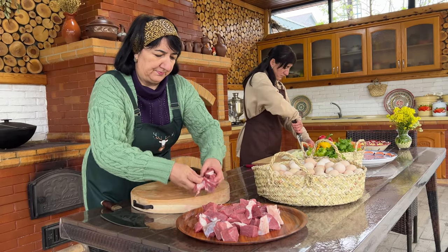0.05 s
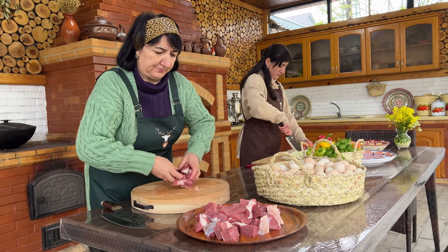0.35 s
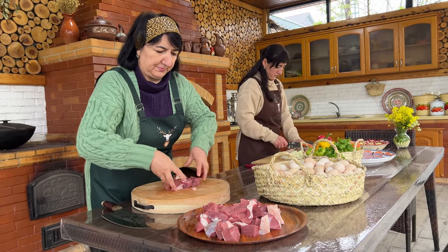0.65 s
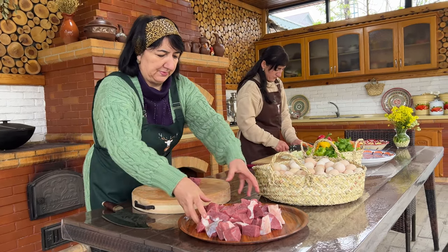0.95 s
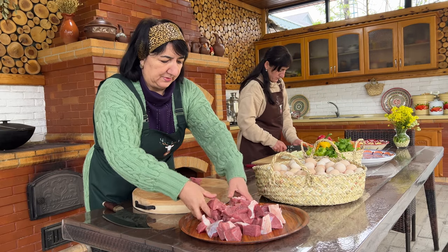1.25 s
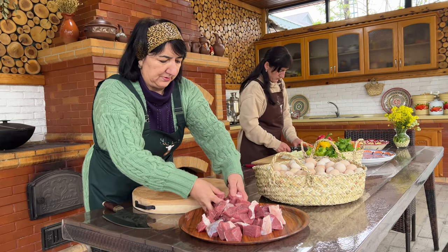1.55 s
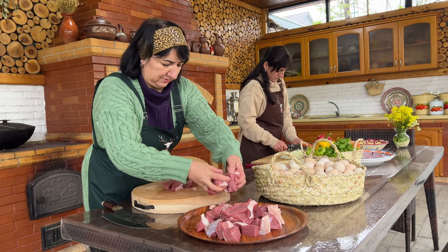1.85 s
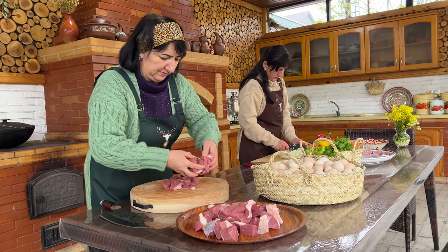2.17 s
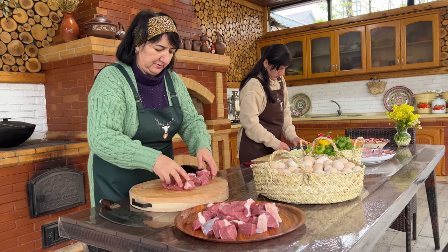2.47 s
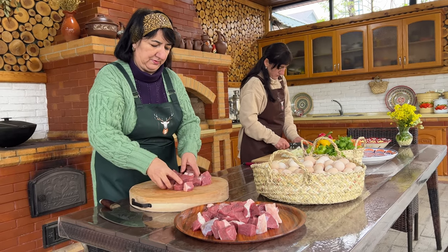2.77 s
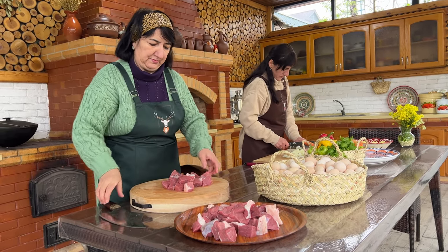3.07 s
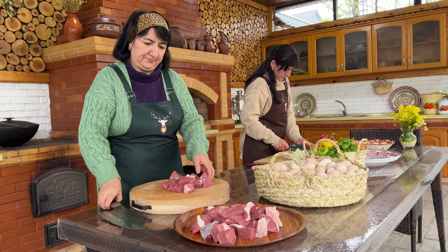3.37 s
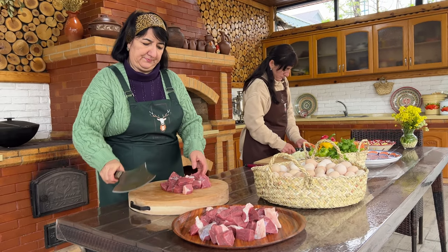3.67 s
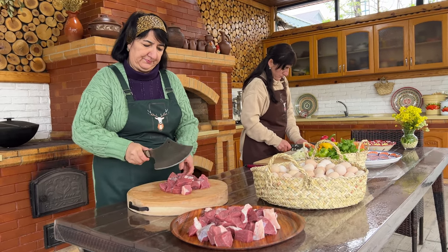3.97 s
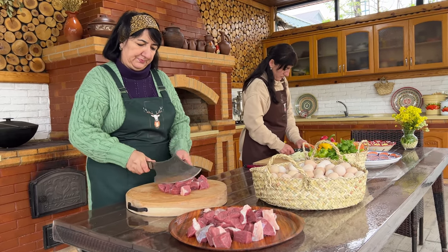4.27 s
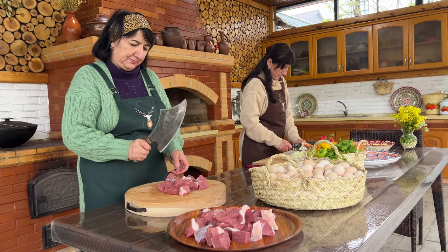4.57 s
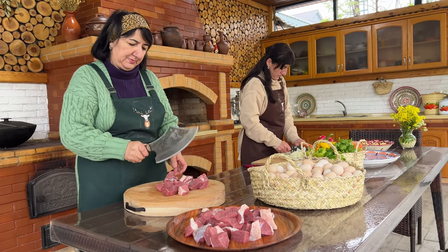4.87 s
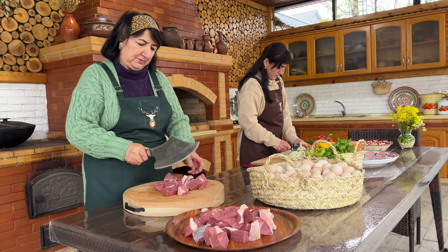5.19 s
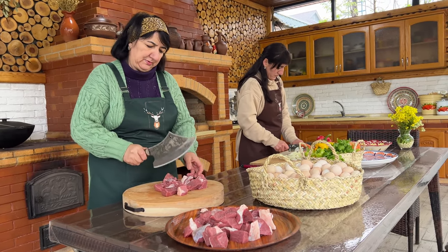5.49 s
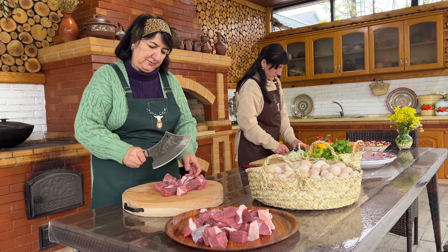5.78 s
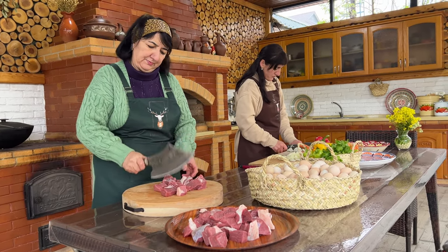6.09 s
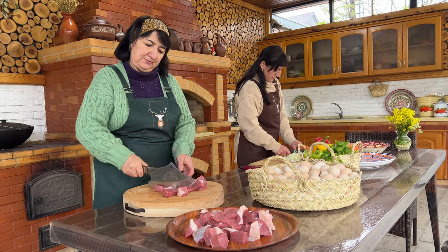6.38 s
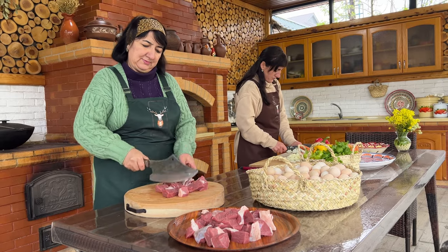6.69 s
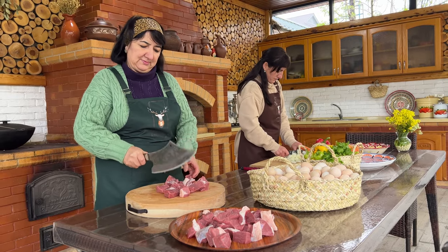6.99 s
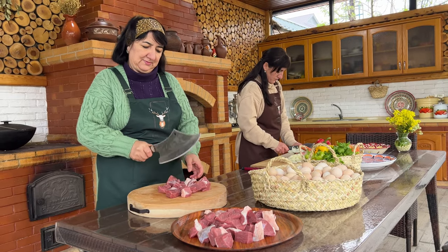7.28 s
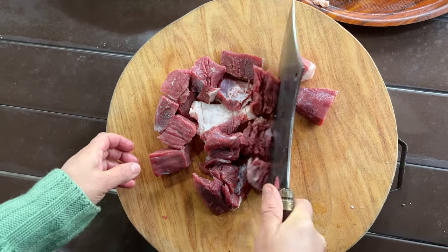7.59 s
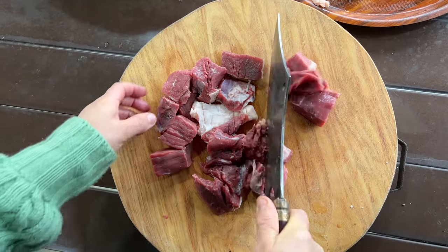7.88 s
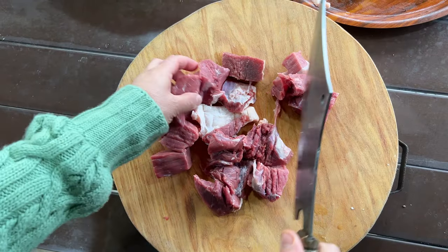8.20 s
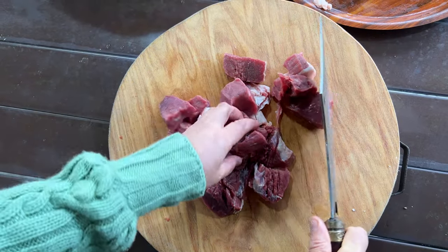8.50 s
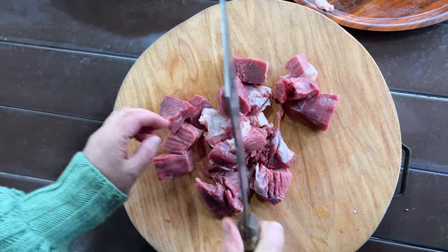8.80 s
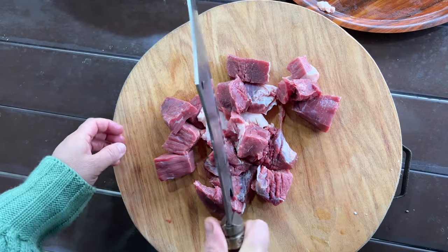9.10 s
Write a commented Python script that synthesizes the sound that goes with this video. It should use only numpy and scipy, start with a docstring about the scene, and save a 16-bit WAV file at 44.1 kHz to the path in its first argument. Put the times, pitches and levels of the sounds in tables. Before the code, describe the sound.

Slow knife knocks and moist rustling give way to quick cleaver chops through raw meat onto wood, over faint outdoor air.

```python
"""Wet meat rustles in the hands over steady outdoor air: two cooks cut raw meat in a roofed kitchen.
One slices slowly, her knife hissing through the fibres and knocking on the board. From 4.7 s the other
chops with a cleaver: a squelch, a crack on thick wood, the board hopping on the table. The last chops
are heard from just above the board, where they shake the table and the heaviest overload the microphone."""
import sys
import numpy as np
from scipy import signal
from scipy.fft import rfft, irfft
from scipy.io import wavfile
from scipy.ndimage import uniform_filter1d

SR = 44100
rng = np.random.default_rng(int(sys.argv[2]) if len(sys.argv) > 2 else 0)


def dump(signal):
    """Clip the signal to [-1, 1] and save it as 16-bit WAV at the path in sys.argv[1]."""
    limited = np.clip(np.atleast_2d(signal).T, -1, 1)
    pcm = np.round(limited * 32767).astype(np.int16)
    wavfile.write(sys.argv[1], SR, pcm)


N = 407925
TIME_S = np.arange(N) / SR
HIT_TIME_S = TIME_S[:2 ** 14]

# air and draught spectra: freq_hz, gain_db
AIR_FAR = [(41, -17), (70, -9), (155, -10.5), (213, -22.5), (244, -6.5), (280, -18), (394, -12.5),
           (431, -21), (462, -16.5), (727, -21.5), (834, -18.5), (1230, -24.5), (2780, -32.5), (16000, -58)]
AIR_NEAR = [(41, -43), (70, 3), (86, -31), (152, 4.5), (178, -16), (244, -4), (274, -24), (307, -6.5),
            (336, -28), (412, -21.5), (517, -26), (761, -24), (1020, -27.5), (4190, -35), (16000, -68)]
RUMBLE = [(8, -5), (18, 13.5), (32, -7), (50, -9.5), (80, -19.5), (160, -37), (400, -82)]
# draught on the microphone: time_s, level_db
DRAUGHT = [(0, -40.5), (.5, -36), (2.4, -39.5), (3.3, -32), (5.5, -42), (6.6, -37.5), (8, -29.5),
           (8.4, -39), (9.25, -33)]
# air crossfade: time_s, near (0 across the table, 1 above the board)
NEARNESS = [(7.1, 0.01), (7.45, 0.98)]
# kitchen decay: freq_hz, t60_s
ROOM_T60 = [(500, 0.37), (3000, 0.34), (12000, 0.3)]
# room tail spectra by blow: freq_hz, gain_db
CHOP_ROOM = [(40, 5), (120, 11), (400, 0), (800, 0.5), (1500, -9.5), (2800, -10), (4500, -19.5),
             (6500, -31.5), (10000, -39), (16000, -47)]
HOP_ROOM = [(60, 8.5), (150, 0.5), (400, 5.5), (700, -7), (1300, -11.5), (2800, -20), (5000, -32),
            (8000, -44), (16000, -53)]
KNOCK_ROOM = [(60, -15.5), (150, -0.5), (260, 0.5), (400, 2), (620, -1.5), (900, -8), (1300, -15.5),
              (2000, -21.5), (4000, -27.5), (16000, -58)]
CLICK_ROOM = [(60, -40), (300, -3), (1000, 14.5), (2000, -0.5), (3500, -2.5), (5500, -11), (8000, -18),
              (16000, -34)]
# contact noise spectra: freq_hz, gain_db
RUB = [(100, -2), (330, 8.5), (700, -1), (1300, -6.5), (2500, -15.5), (6000, -30), (16000, -42)]
SLICE = [(100, 2), (300, 5.5), (600, 1), (1200, -12), (2000, -10.5), (2800, -13), (5500, -16.5),
         (7000, -25.5), (11000, -27), (16000, -32)]
EDGE_CLICK = [(50, -38), (200, -2.5), (500, 10), (900, 9), (1700, -2.5), (3000, -5), (4500, -12.5),
              (7000, -23), (11000, -33), (16000, -43)]
SQUELCH = [(300, 0.5), (1500, -4), (4000, -2), (6500, -10.5), (9000, -13), (16000, -21)]
CRACK = [(150, -14), (600, 4), (1500, 4.5), (2500, -2.5), (4000, -12.5), (6300, -26), (8500, -26.5),
         (16000, -36)]
CLACK = [(200, -20), (900, 13.5), (1700, 5), (3000, 0), (4500, -10), (7000, -27), (11000, -34),
         (16000, -54)]
# modes: freq_hz, gain_db, t60_s
PLATE_MODES = [(588, 5.5, 0.24), (1000, -5, 0.3), (1125, 2.5, 0.082), (1540, -9, 0.087), (2770, -19, 0.045)]
BLADE_MODES = [(2580, 1, 0.19), (2700, -7, 0.3), (5700, -14, .2)]
SLICING_BOARD_MODES = [(152.5, -9, 0.078), (330, -1, 0.042), (569, -2, 0.1), (698, 0, 0.039),
                       (1150, -8, 0.01)]
CHOPPING_BOARD_MODES = [(119, 0, 0.044), (230, -3.5, 0.064), (476, -1.5, 0.045), (532, 3, 0.018),
                        (791, -2, 0.032), (1056, -4.5, 0.012), (1251, -11, 0.047), (1487, -13.5, 0.08),
                        (1903, -19, 0.049)]
TABLE_MODES = [(139.7, -6.5, 0.197), (279.6, -5, 0.15), (366.7, 2.5, 0.076), (509.6, -3, 0.095),
               (720, 0, 0.028), (1100, -15, 0.059), (1470, -7, 0.017)]
# thin squeaks: start_s, length_s, start_hz, end_hz, level_db
SQUEAKS = [(0.11, 0.0051, 2950, 1450, -41.5), (8.207, 0.042, 4400, 4170, -58.5)]
# meat slides or flops on wood: start_s, end_s, level_db
RUBS = [(0.164, 0.35, -51), (1.245, 1.297, -47), (7.99, 8.023, -42.5), (8.024, 8.059, -45)]
# meat turned in the hands: start_s, end_s, relative_db
RUSTLES = [(0, 0.504, -62.5), (0.922, 1.194, -66), (1.208, 1.45, -60.5), (1.816, 2.48, -61.5),
           (3.203, 3.478, -68), (8.05, 8.587, -63)]
# meat unsticking from fingers and blade: start_s, relative_db
SMACKS = [(1.296, -45), (1.5738, -47), (3.244, -48.5), (3.881, -58), (4.9207, -39.5), (7.4318, -38),
          (8.158, -45), (8.2244, -51), (8.3054, -51), (8.3524, -48), (8.517, -47.5)]
# fingers nudging the clay plate: start_s, relative_db
NUDGES = [(1.15, -29.5), (1.224, -37.5), (1.261, -40.5)]
# slicing strokes: impact_s, knock_db, hiss_db
STROKES = [(1.375, -26, -50.5), (1.982, -18.5, -47.5), (2.418, -11.5, -59), (3.533, -23, -49),
           (4.264, -24.5, -44.5), (4.957, -23.5, -44.5), (5.606, -20, -44), (6.317, -20.5, -43),
           (7.003, -27, -44)]
# cleaver chops: impact_s, force_db, wet_db, flight_s, landing_db, near
CHOPS = [(4.702, -8, -40.5, .041, -25.5, 0.01), (5.0691, -4.5, -47.5, .042, -25, 0.08),
         (5.3691, -3.5, -42.5, 0.047, -26.5, 0.28), (5.639, -4.5, -52, 0.043, -26.5, 0.02),
         (5.8937, -3, -45, .052, -30.5, 0.12), (6.1529, 1, -45, 0.055, -25.5, 0),
         (6.4055, .5, -35, 0.05, -31, 0.13), (6.656, -3.5, -43, 0.052, -28, 0.1),
         (6.905, -0.5, -50, 0.055, -26, 0.11), (7.006, -11, -49, 0.036, -29, 0.51),
         (7.148, -6, -53, .041, -31, 0.3), (7.3063, -2, -34, 0.037, -14.5, 0.92),
         (7.5927, 0.5, -34, 0.031, -14, 0.98), (7.8633, 7.5, -31.5, 0.04, -15.5, 0.98),
         (8.896, -16, -29.5, .03, -25.5, 0.89), (9.23, -2, -26, .035, -12, 0.99)]

# pairs: across the table, above the board
CRACK_DB, BOARD_DB, TABLE_DB = (-24.5, -19.5), (-21, -9.5), (-30.5, -19.5)  # at force 0 dB
SHAKE_DB, CHOP_ROOM_DB = (-34, -8), (-28.5, -31.5)  # at force 0 dB
CLACK_DB, HOP_ROOM_DB = (-3, -12), (-9, -18.5)  # re landing
ROOF_GAIN_DB, ROOF_LAG_S = (2, 0), (0.016, 0.012)


def amp(db):
    """Decibels to gain."""
    return 10 ** (np.asarray(db) / 20)


def curve(rows, at):
    """Straight lines through (x, value) rows."""
    return np.interp(at, *np.transpose(rows))


def between(pair, near):
    """Blend from across the table (near 0) to above the board (near 1)."""
    return pair[0] + (pair[1] - pair[0]) * near


def unit(x):
    """Scale to rms 1."""
    return x / np.sqrt(np.mean(x ** 2))


def unit_hit(x):
    """Scale the loudest 10 ms to rms 1."""
    return x / np.sqrt(uniform_filter1d(x ** 2, size=441).max())


def tint(x, spectrum, size=2048):
    """Minimum-phase filter through (freq_hz, gain_db) points."""
    hz, db = np.transpose(spectrum)
    log_hz = np.log(np.fft.rfftfreq(size, 1 / SR) + 1)
    cepstrum = irfft(np.log(amp(np.interp(log_hz, np.log(hz), db))))
    cepstrum[1:size // 2] *= 2
    cepstrum[size // 2 + 1:] = 0
    return signal.oaconvolve(x, irfft(np.exp(rfft(cepstrum))))[:len(x)]


def add(out, start_s, x):
    """Mix x into out at start_s."""
    i = max(int(start_s * SR), 0)
    out[i:i + len(x)] += x[:max(len(out) - i, 0)]


def walk(rate_hz):
    """Smooth random drift, spread near 1."""
    step = int(SR / rate_hz)
    return 1.7 * uniform_filter1d(np.repeat(rng.standard_normal(N // step + 1), step), step)[:N]


def swell(length_s, taper=0.35):
    """Fade in, hold, fade out."""
    return signal.windows.tukey(max(int(length_s * SR), 2), taper)


def decay(t, t60_s):
    """Fall of 60 dB per t60_s."""
    return np.exp(-np.log(1000) * t / t60_s)


def ring(modes, detune, scatter_db):
    """Struck modes of alternating sign; each blow lands elsewhere, varying pitch and strength."""
    t = TIME_S[:SR // 8]
    hz, db, t60_s = np.transpose(modes)[:, :, None]
    pitch, strength = rng.standard_normal((2, len(modes), 1))
    partials = amp(db + scatter_db * strength) * np.sin(2 * np.pi * hz * (1 + detune * pitch) * t)
    signs = np.cos(np.pi * np.arange(len(modes)))[:, None]
    motion = np.sum(signs * partials * decay(t, t60_s), axis=0)
    return unit_hit(np.convolve(motion, np.hanning(13))[:len(motion)])  # wood gives: rounded onset


def burst(spectrum, rise_s, decay_s, size=2500):
    """Contact noise that swells and dies away."""
    t = TIME_S[:size]
    envelope = np.minimum(t / rise_s, 1) ** 2 * np.exp(-np.maximum(t - rise_s, 0) / decay_s)
    return unit_hit(tint(envelope * rng.standard_normal(size), spectrum))


def outdoors(far_db=-57, near_db=-44.5):
    """Distant air at both listening positions; a draught rumbles on the microphone."""
    near = curve(NEARNESS, TIME_S)
    far_air = amp(far_db) * unit(tint(rng.standard_normal(N), AIR_FAR, size=8192))
    near_air = amp(near_db) * unit(tint(rng.standard_normal(N), AIR_NEAR, size=8192))
    rumble = amp(curve(DRAUGHT, TIME_S)) * unit(tint(rng.standard_normal(N), RUMBLE, size=16384))
    air = np.sqrt(1 - near) * far_air + np.sqrt(near) * near_air
    return air * amp(1.6 * walk(1.5)) + rumble


def kitchen(spectrum, build_s=0.011):
    """Brick and tile scatter a blow into a short dense tail; treble dies first."""
    t = HIT_TIME_S
    noise = rfft(rng.standard_normal(len(t)))
    octave = np.log2(np.fft.rfftfreq(len(t), 1 / SR) + 1)
    centres_hz, t60s_s = np.transpose(ROOM_T60)
    tail = sum(irfft(noise * np.interp(octave, np.log2(centres_hz), band)) * decay(t, t60_s)
               for band, t60_s in zip(np.eye(len(t60s_s)), t60s_s))
    tail = tint(tail * np.minimum(t / build_s, 1), spectrum)
    return tail / np.std(tail[:SR // 20])


def room_tail(spectrum, near, treble_db=-5.5):
    """The kitchen's tail, duller above the board."""
    return tint(kitchen(spectrum), [(500, 0.0046), (5000, treble_db * near)])


def roof_echo(crack):
    """The roof returns the bright part of a crack."""
    return tint(crack, [(100, -2), (700, -20), (2000, -10), (4000, 0.5), (8000, 2), (16000, -46)])


def squeaks():
    """Short falling tones."""
    out = np.zeros(N)
    for start_s, length_s, start_hz, end_hz, db in SQUEAKS:
        hz = np.linspace(start_hz, end_hz, int(length_s * SR))
        add(out, start_s, amp(db) * np.hanning(len(hz)) * np.sin(2 * np.pi * np.cumsum(hz) / SR))
    return out


def rubs():
    """Dull friction and soft flops of meat on wood."""
    envelope = np.zeros(N)
    for start_s, end_s, db in RUBS:
        add(envelope, start_s, amp(db) * swell(end_s - start_s, taper=0.96))
    friction = rng.standard_normal(N) * amp(2.6 * walk(120))
    return envelope * unit(tint(friction, RUB))


def sticky_ticks(rate_hz=260, spread_db=3.5, low_hz=3500, high_hz=14500, decay_cycles=1.9):
    """Wet films snap in tiny ticks, each at its own pitch, a few louder."""
    out, t = np.zeros(N), TIME_S[:128]
    when, pitch, size = rng.random((int(rate_hz * N / SR), 3)).T
    hz = (low_hz + (high_hz - low_hz) * pitch)[:, None]
    db = spread_db * np.minimum(-np.log(1 - size), 4)[:, None]
    ticks = amp(db) * np.sin(2 * np.pi * hz * t) * np.exp(-np.pi * hz * t / decay_cycles)
    for start_s, tick in zip(when * N / SR, ticks):
        add(out, start_s, tick)
    return unit(out)


def handling(films_per_s=4000):
    """Tiny bursting films make a wet rustle; sticky meat lets go in single smacks."""
    envelope = np.zeros(N)
    for start_s, end_s, db in RUSTLES:
        add(envelope, start_s, amp(db) * swell(end_s - start_s))
    films = (rng.random(N) < films_per_s / SR) * rng.standard_normal(N) * amp(0.84 * walk(82))
    rustle = tint(films, [(400, -8), (1500, -4), (5500, 0.5), (7000, -10), (9000, -5.5), (16000, -17)])
    out = envelope * (amp(-8) * unit(rustle) + amp(-10) * sticky_ticks())
    for start_s, db in SMACKS:
        smack = burst([(500, 7), (2500, -1), (6000, -6), (16000, -11)], rise_s=0.00032, decay_s=0.0025)
        add(out, start_s, amp(db - 7.5) * smack)
    return out


def plate():
    """Nudged clay clinks dully into the room."""
    out = np.zeros(N)
    for start_s, db in NUDGES:
        add(out, start_s, amp(db - 11.5) * ring(PLATE_MODES, detune=0.0295, scatter_db=4.5))
        contact = burst([(500, 2), (1500, 0), (3000, -3), (7500, -10.5), (11000, -31)],
                        rise_s=0.0018, decay_s=0.012)
        add(out, start_s, amp(db - 19) * contact)
        add(out, start_s, amp(db - 21) * kitchen(CHOP_ROOM))
    return out


def slicing_knife(lead_s=0.138, draw_s=0.19, wall_lag_s=0.0063, wall_db=-3, hiss_room_db=-8.5):
    """Fibres part in a hiss, the edge knocks on wood, the blade rings; a close wall doubles each knock."""
    knocks, ringing, draw = np.zeros((3, N))
    for impact_s, knock_db, hiss_db in STROKES:
        click_db = -42.5 + 2.5 * (knock_db + 21.5)  # grows faster than the knock
        add(draw, impact_s - lead_s, amp(hiss_db) * swell(draw_s, taper=1))
        add(knocks, impact_s, amp(knock_db) * ring(SLICING_BOARD_MODES, detune=0.018, scatter_db=1.5))
        add(knocks, impact_s, amp(click_db) * burst(EDGE_CLICK, rise_s=0.0013, decay_s=0.0059))
        add(ringing, impact_s, amp(hiss_db - 6) * ring(BLADE_MODES, detune=0.0065, scatter_db=5))
        add(ringing, impact_s, amp(knock_db - 15.5) * kitchen(KNOCK_ROOM))
        add(ringing, impact_s, amp(click_db - 13.5) * kitchen(CLICK_ROOM))
    fibres = rng.standard_normal(N) * amp(1.5 * walk(350))
    hiss = draw * unit(tint(fibres, SLICE))
    room = kitchen([(1000, 0), (12000, -1)])
    hiss_tail = amp(hiss_room_db) * signal.oaconvolve(hiss, room / np.linalg.norm(room))[:N]
    out = knocks + ringing + hiss + hiss_tail
    add(out, wall_lag_s, amp(wall_db) * knocks)
    return out


def peeling(re_squelch_db=-22, decay_s=0.065):
    """Cut meat crackles as it peels off the cleaver."""
    envelope = np.zeros(N)
    for impact_s, _, wet_db, *_ in CHOPS:
        add(envelope, impact_s, amp(wet_db + re_squelch_db) * np.exp(-HIT_TIME_S / decay_s))
    return envelope * sticky_ticks()


def table_shake(press_s, swing_hz=41, sway_hz=29.55, sway_db=-8.5, cushion_s=0.019):
    """The blade presses into the meat, the table swings back, its legs sway on."""
    t = HIT_TIME_S - press_s
    press = 2.13 * (HIT_TIME_S / press_s) ** 2
    swing = np.sin(2 * np.pi * swing_hz * t) * decay(t, t60_s=0.21)
    sway = amp(sway_db) * np.sin(2 * np.pi * sway_hz * t) * decay(t, t60_s=0.64)
    motion = np.where(t < 0, press, -swing - sway)
    stop_s = 0.5 * press_s ** 2 / cushion_s  # meat stops a slow blade softly
    return unit_hit(uniform_filter1d(motion, size=max(int(stop_s * SR), 1)))


def board_blow(near, bass_db=1, treble_db=-4):
    """The thick board is driven down; deep modes dominate just above it."""
    motion = -ring(CHOPPING_BOARD_MODES, detune=0.0333, scatter_db=4)
    return tint(motion, [(250, bass_db * near), (2500, treble_db * near)])


def landing(near):
    """The board, lifted by recoil, claps down on the table."""
    out = amp(between(HOP_ROOM_DB, near)) * room_tail(HOP_ROOM, near)
    add(out, 0, ring(TABLE_MODES, detune=0.048, scatter_db=-0.5))
    add(out, 0, amp(between(CLACK_DB, near)) * burst(CLACK, rise_s=0.00033, decay_s=0.007))
    return out


def chop(force_db, wet_db, near, meat_s, press_share=0.63, swing_back_s=0.014):
    """The blade squelches through meat for meat_s, then cracks on the board; board and table ring."""
    out = np.zeros(SR)
    add(out, 0, amp(wet_db) * burst(SQUELCH, rise_s=0.66 * meat_s, decay_s=0.5 * meat_s))
    shake_db = between(SHAKE_DB, near) + 0.09 * force_db
    add(out, (1 - press_share) * meat_s, amp(shake_db) * table_shake(press_share * meat_s))
    crack = amp(force_db + between(CRACK_DB, near)) * burst(CRACK, rise_s=0.00044, decay_s=0.0025)
    add(out, meat_s, crack)
    add(out, meat_s + between(ROOF_LAG_S, near), amp(between(ROOF_GAIN_DB, near)) * roof_echo(crack))
    add(out, meat_s, amp(force_db + between(BOARD_DB, near)) * board_blow(near))
    table = ring(TABLE_MODES, detune=0.02, scatter_db=1)
    add(out, meat_s + swing_back_s, amp(force_db + between(TABLE_DB, near)) * table)
    add(out, meat_s, amp(force_db + between(CHOP_ROOM_DB, near)) * room_tail(CHOP_ROOM, near))
    return out


def cleaver(rebound_ratio=0.68, rebound_db=-13.5):
    """Each chop makes the board hop twice, the second hop shorter and weaker."""
    out = np.zeros(N)
    for impact_s, force_db, wet_db, flight_s, landing_db, near in CHOPS:
        meat_s = 0.0083 * amp(-0.32 * force_db)  # a harder chop is through sooner
        add(out, impact_s - meat_s, chop(force_db, wet_db, near, meat_s))
        add(out, impact_s + flight_s, amp(landing_db) * landing(near))
        add(out, impact_s + flight_s * (1 + rebound_ratio), amp(landing_db + rebound_db) * landing(near))
    return out


def scene():
    """Both cooks under one open roof, mono."""
    cooks = cleaver() + slicing_knife() + handling() + plate() + rubs() + squeaks()
    return (cooks + outdoors() + peeling())[None]


def record(dry, ceiling=0.78, cutoff_hz=16100):
    """The microphone flattens the heaviest blows; a low-pass cuts the top."""
    flattened = dry / (1 + (dry / ceiling) ** 8) ** (1 / 8)
    return signal.sosfilt(signal.ellip(8, 0.2, 70, cutoff_hz, fs=SR, output="sos"), flattened)


dry = scene()
out = record(dry)
dump(out)
```